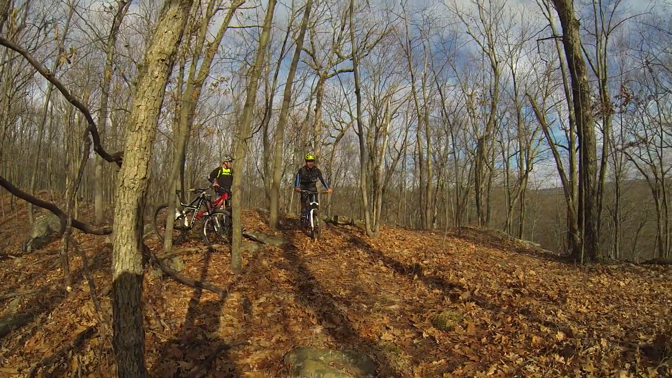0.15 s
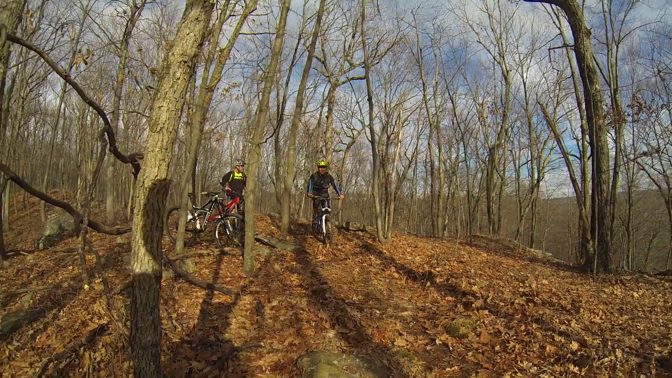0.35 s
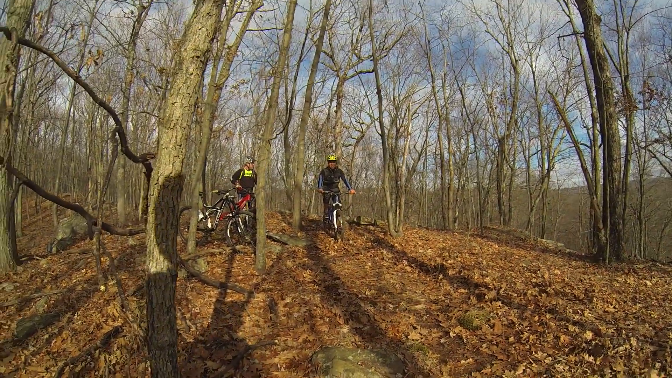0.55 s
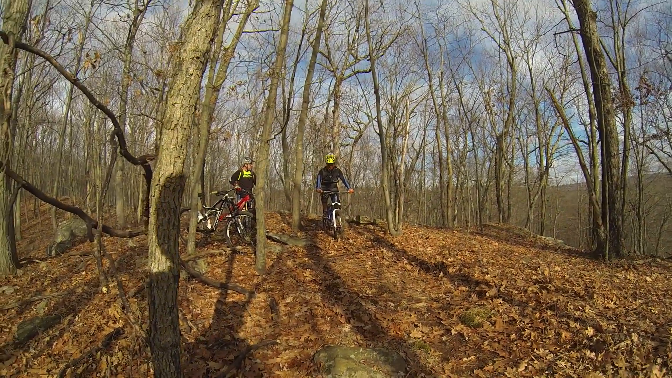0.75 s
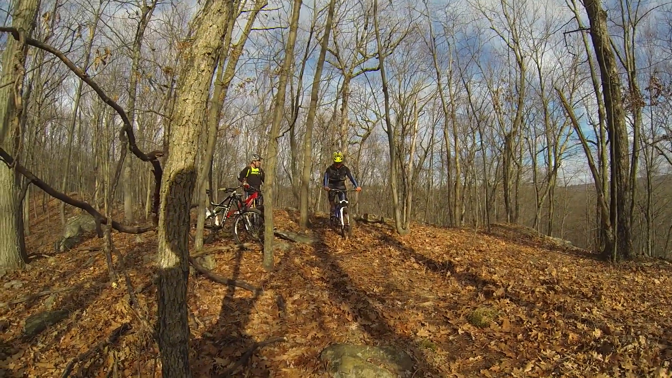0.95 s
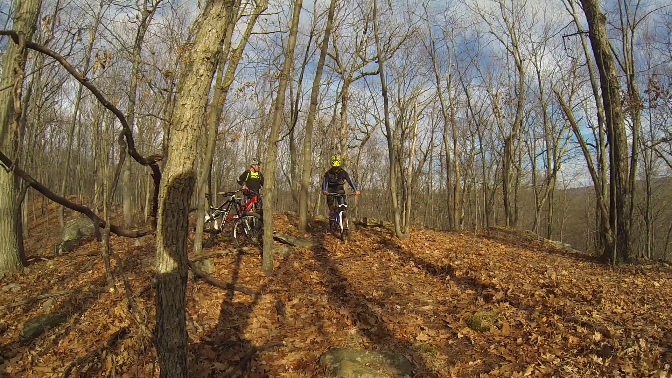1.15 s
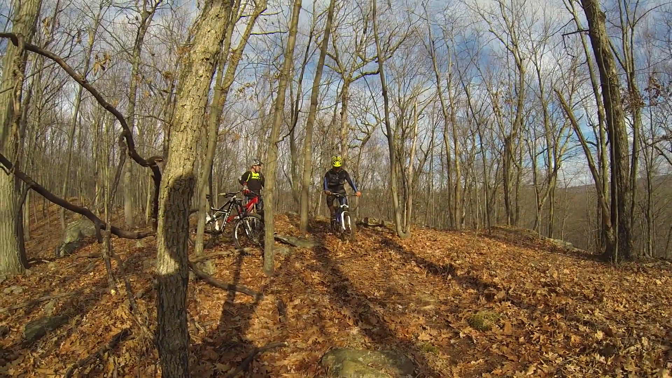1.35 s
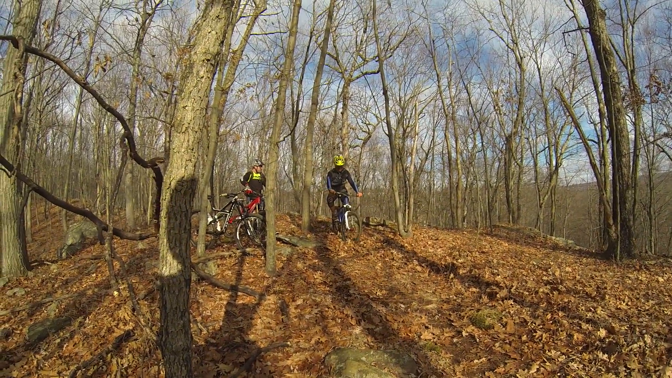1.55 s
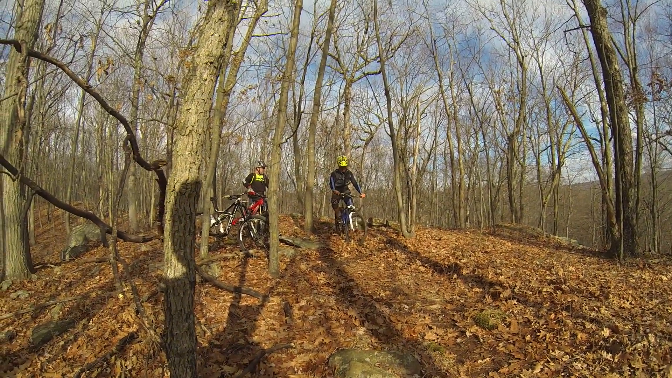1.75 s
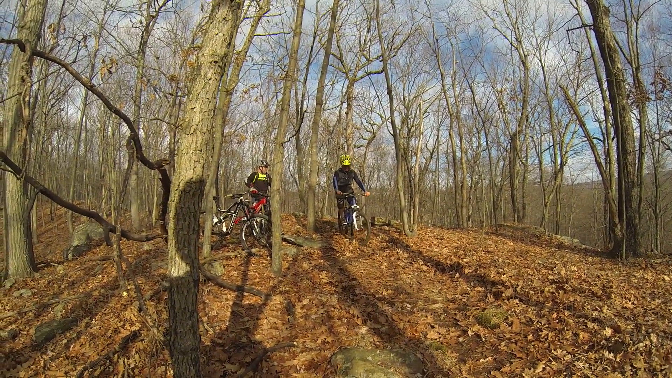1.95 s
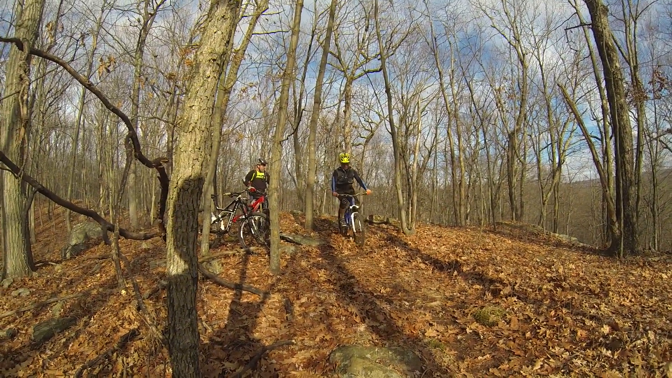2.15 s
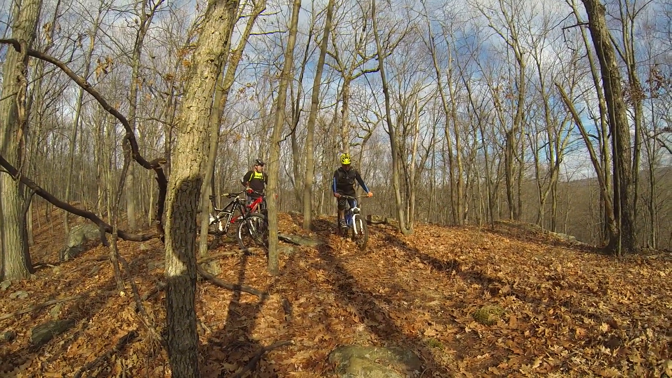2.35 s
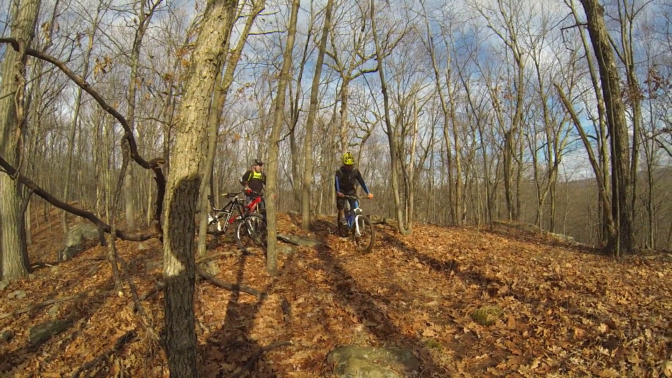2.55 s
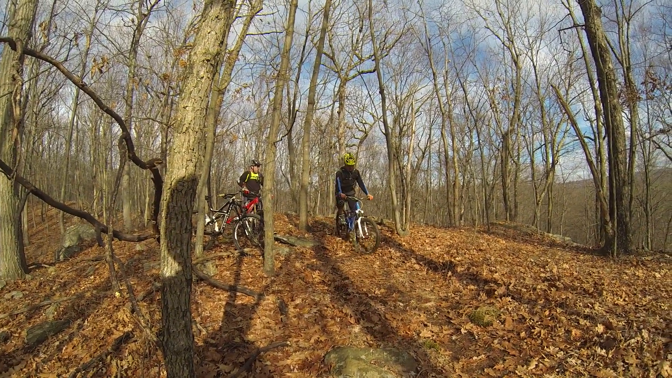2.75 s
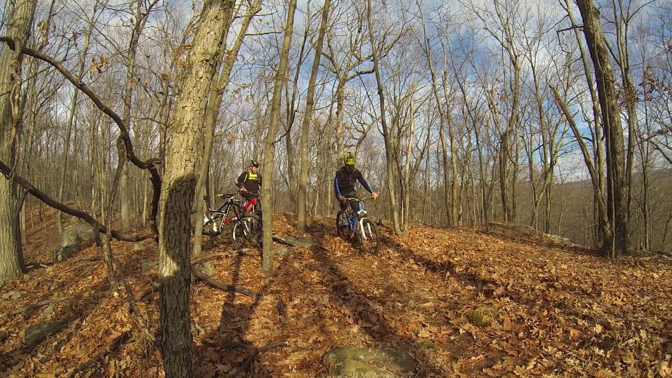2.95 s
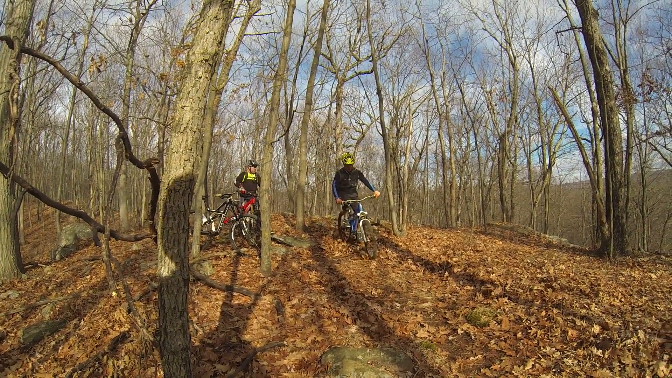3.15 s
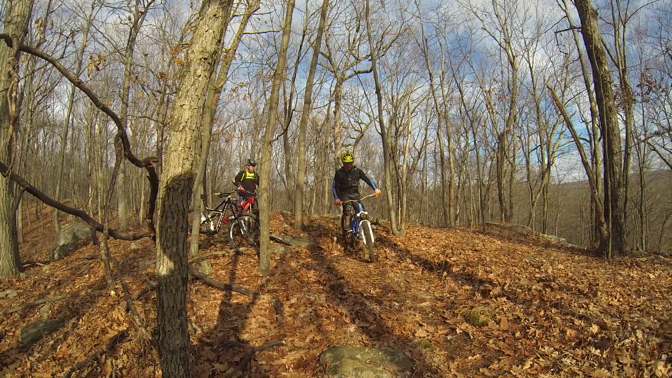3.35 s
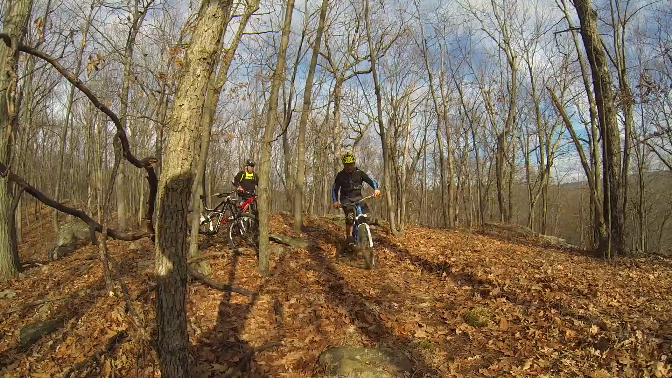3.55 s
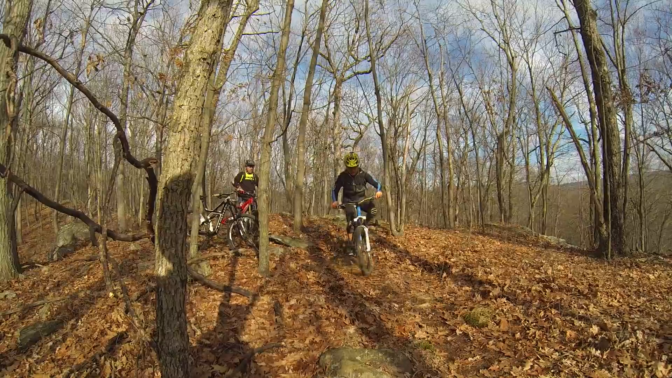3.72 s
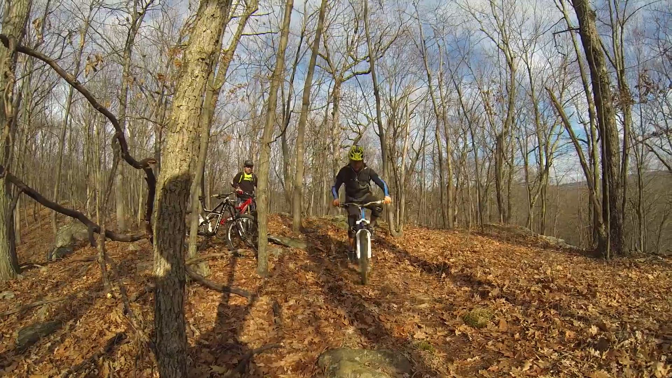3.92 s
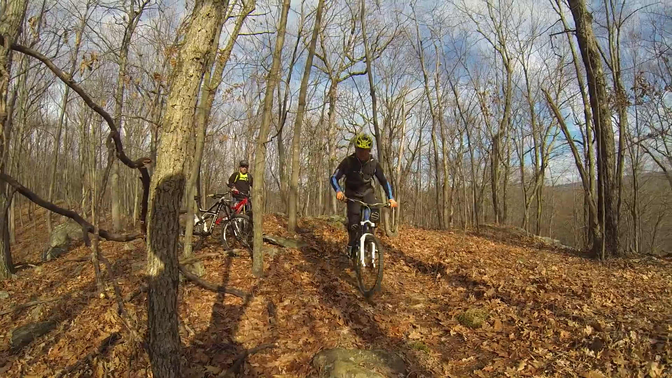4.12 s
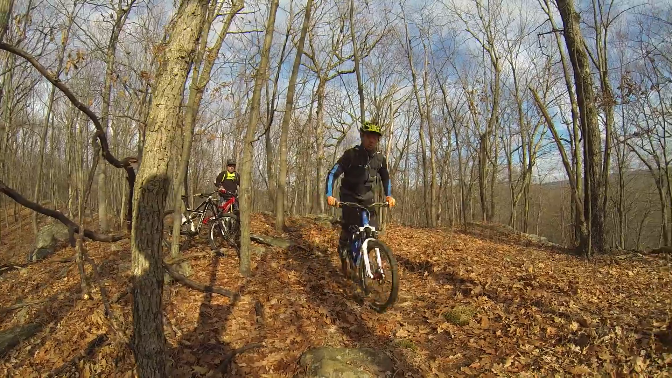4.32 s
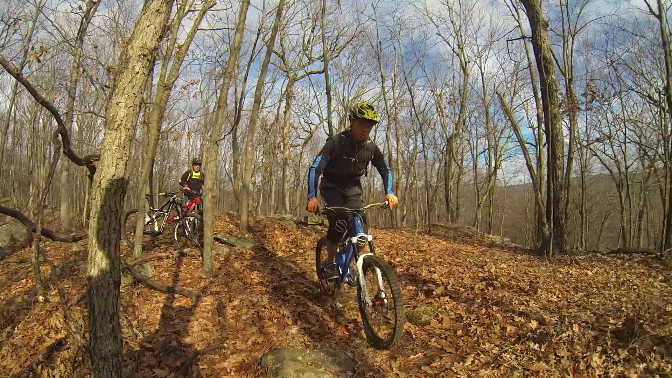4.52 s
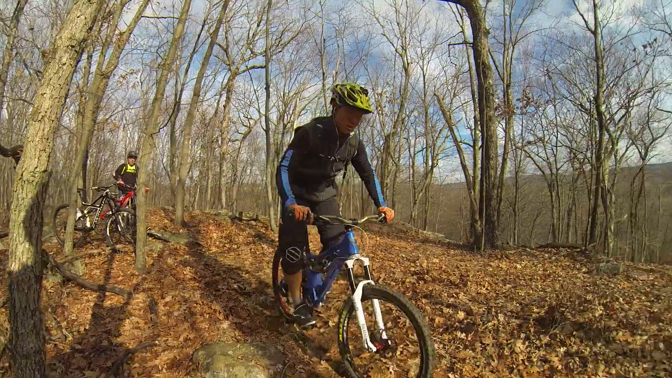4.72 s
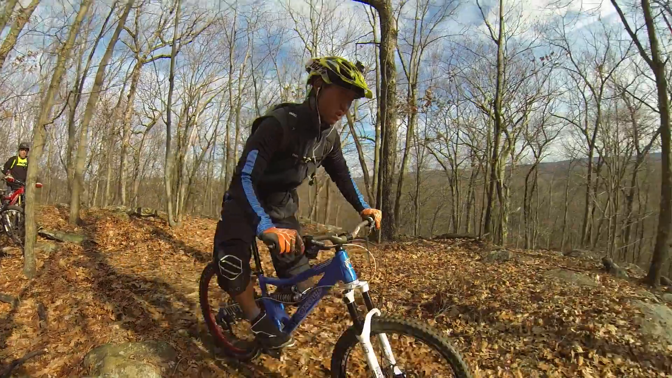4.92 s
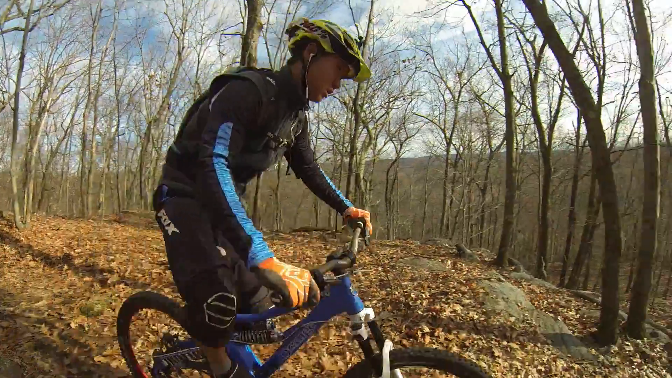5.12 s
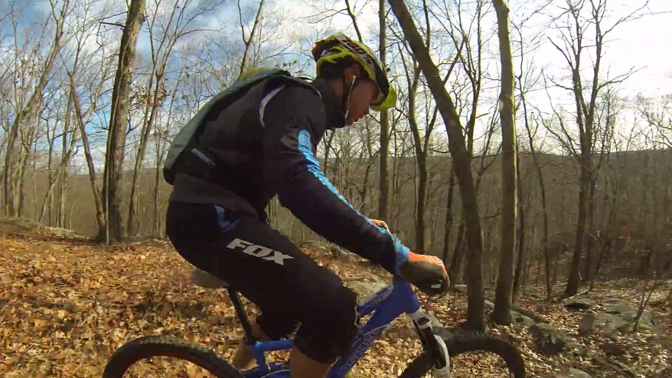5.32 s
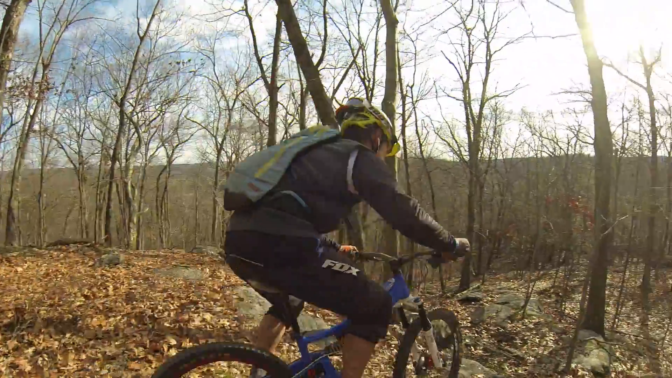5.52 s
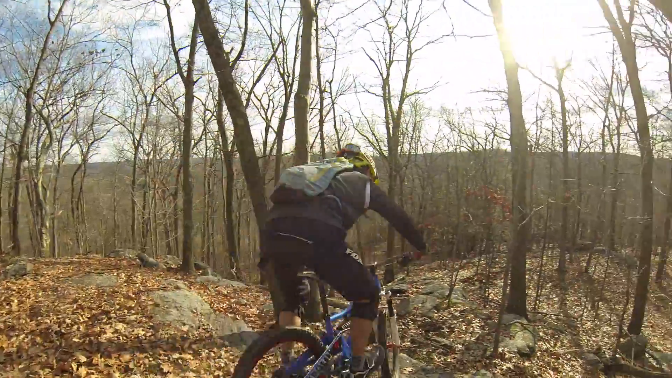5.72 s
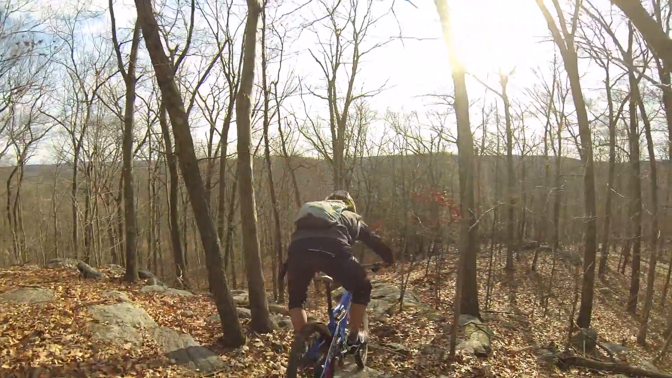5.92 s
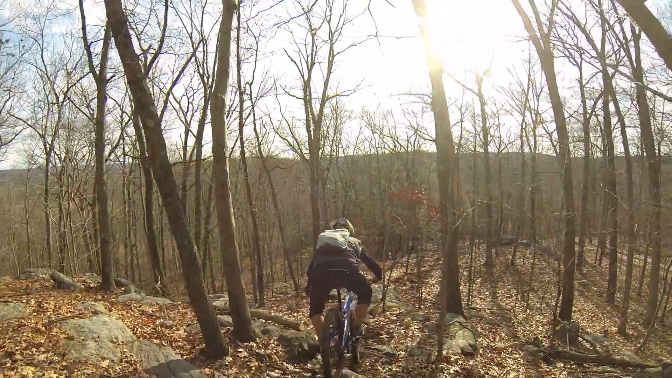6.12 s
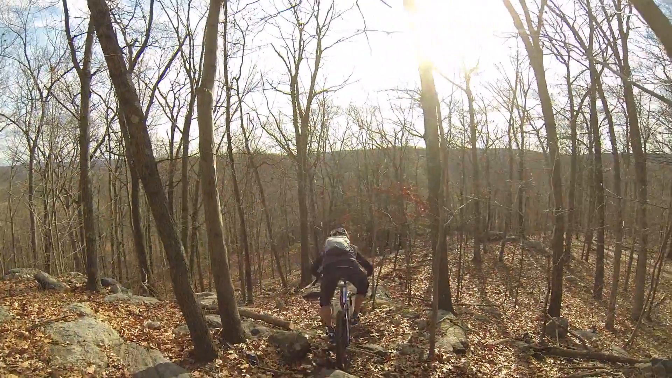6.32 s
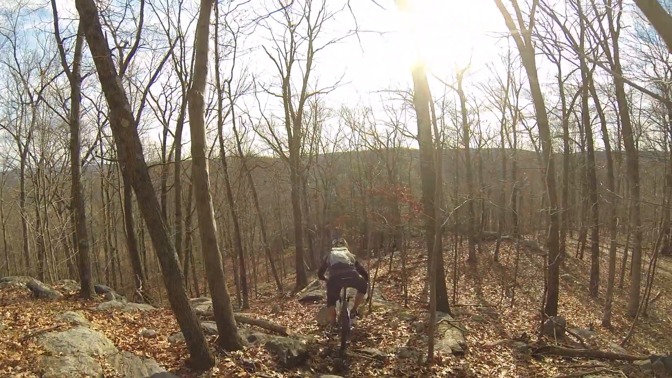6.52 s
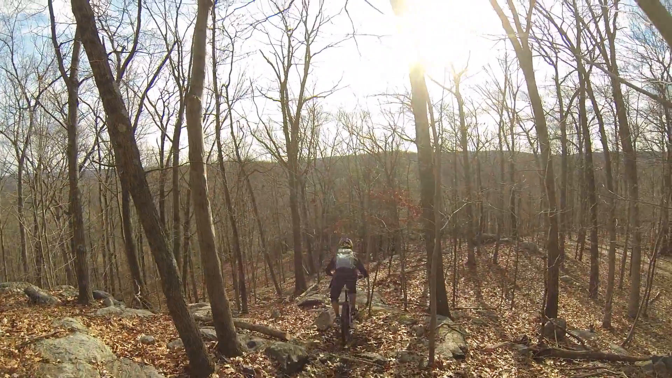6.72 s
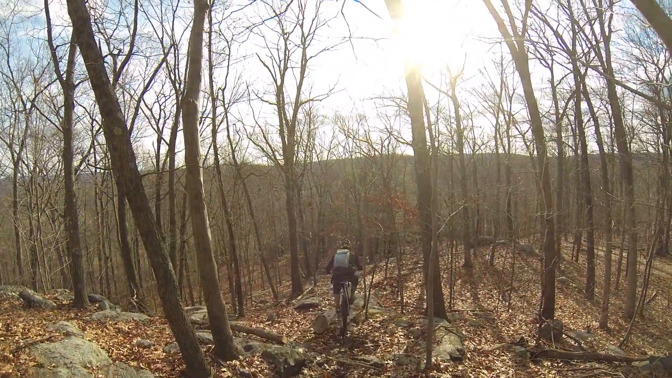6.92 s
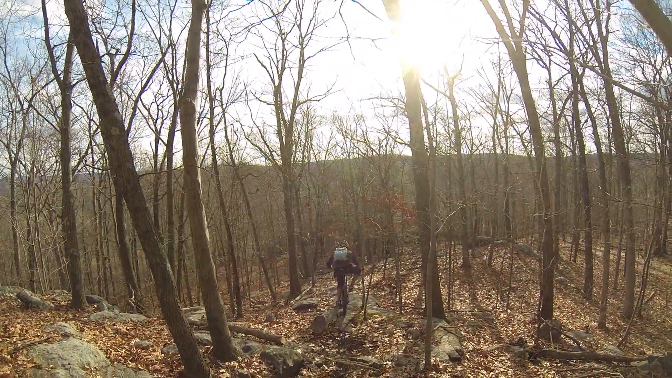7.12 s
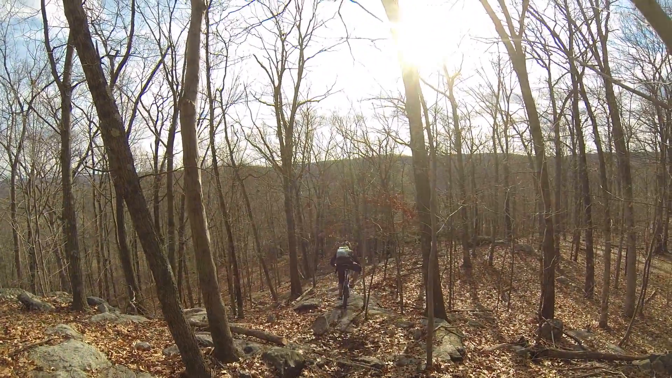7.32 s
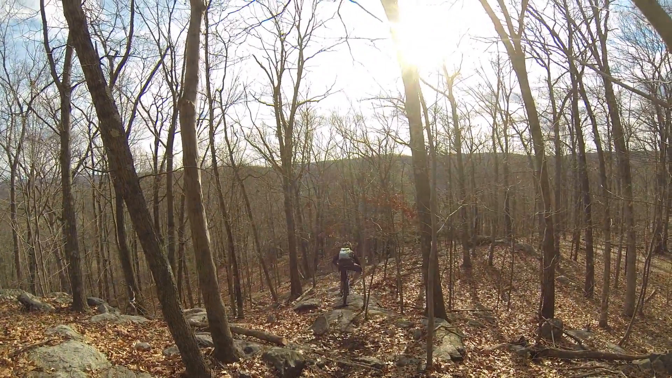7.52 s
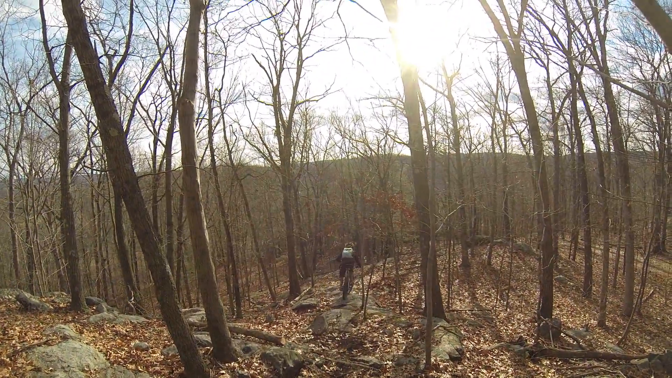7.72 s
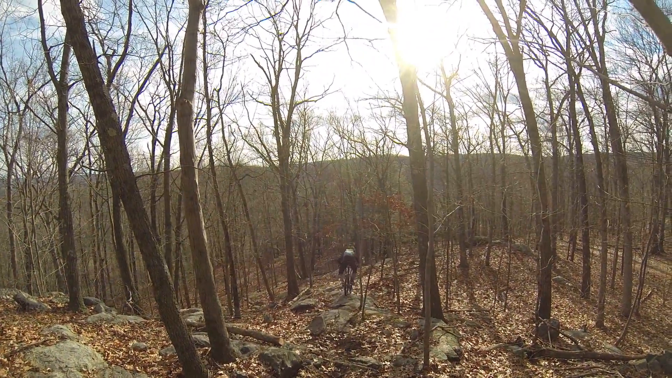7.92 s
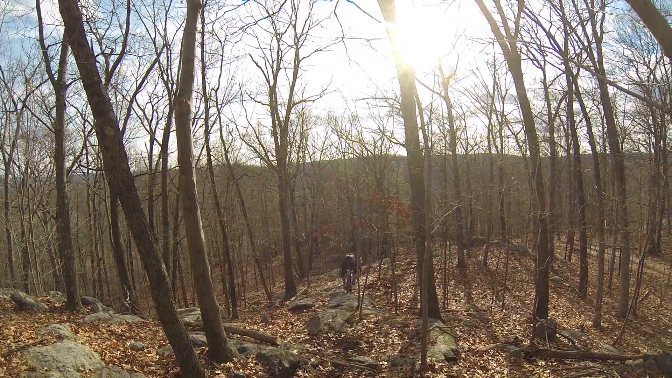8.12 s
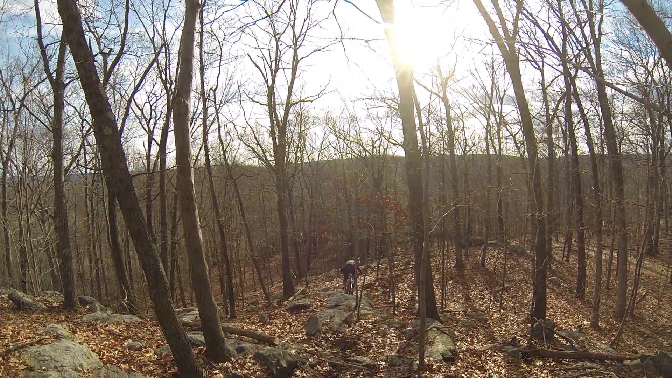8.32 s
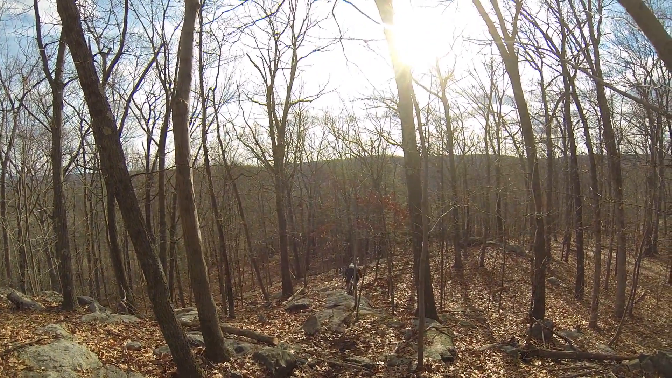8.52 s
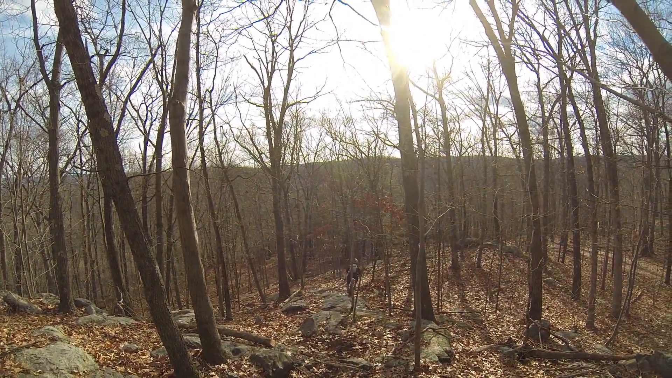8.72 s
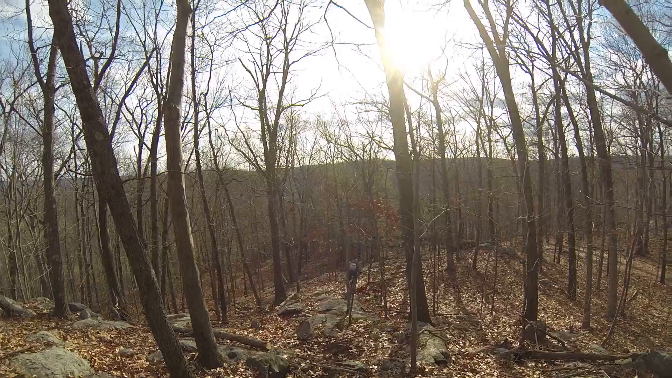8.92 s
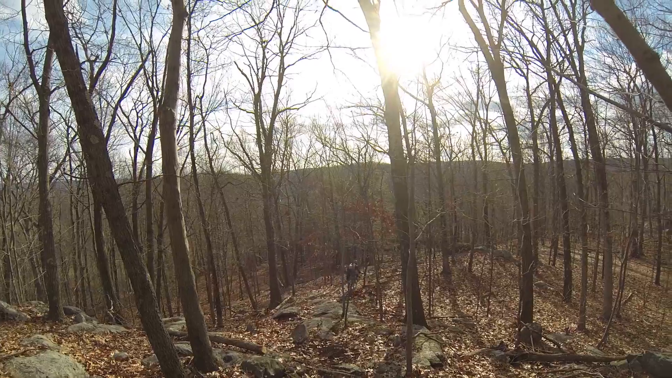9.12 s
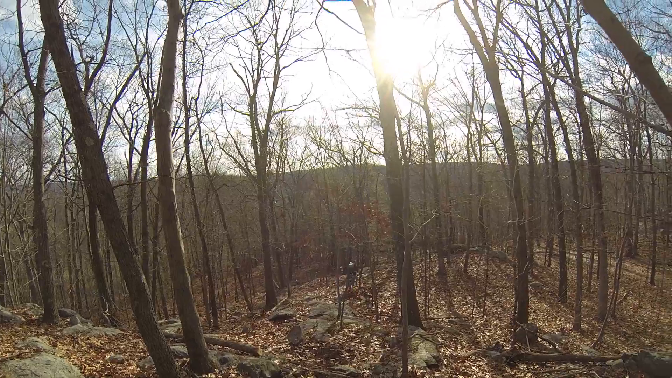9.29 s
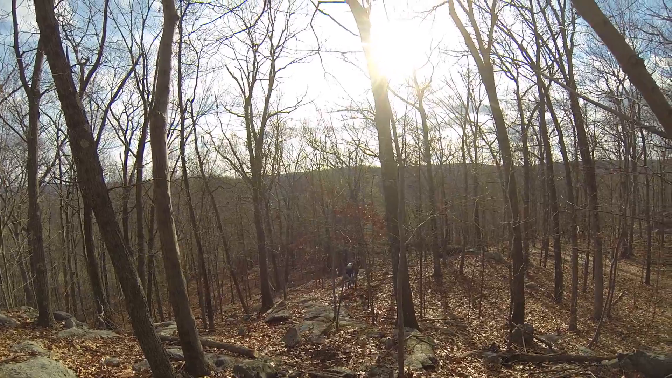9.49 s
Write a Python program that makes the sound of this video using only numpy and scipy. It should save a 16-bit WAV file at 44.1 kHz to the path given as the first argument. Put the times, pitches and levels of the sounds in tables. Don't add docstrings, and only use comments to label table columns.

```python
import sys
import numpy as np
from scipy import signal
from scipy.io import wavfile
from scipy.ndimage import uniform_filter1d

SR = 44100
rng = np.random.default_rng(int(sys.argv[2]) if len(sys.argv) > 2 else 0)


def to_wav(s):
    ch = np.atleast_2d(s).T
    pcm = np.round(np.clip(ch, -1, 1) * 32767)
    wavfile.write(sys.argv[1], SR, pcm.astype(np.int16))


def volts_from_decibels(level):
    exponent = np.asarray(level, float) / 20
    return 10 ** exponent


N = 421243

# (frequency [Hz], level [dB per Hz])
LEAF_COLOUR = [(150, -46.5), (250, -4), (366, -10), (544, -12.5), (870, -9.5), (1280, -6), (1600, 0.5),
               (1900, 1), (2500, -7), (3450, -15), (4170, -25), (5130, -23), (6880, -32.5), (8470, -23),
               (13000, -39), (15500, -52)]


def evened(x):
    return x / np.sqrt(np.mean(x ** 2) + 1e-20)


def curve(rows, t):
    s, *columns = np.transpose(rows)
    return [np.interp(t, s, column) for column in columns]


def coloured(x, points):
    f, db = np.transpose(points)
    hz = abs(np.fft.fftfreq(8192, 1 / SR))
    gain_db = np.interp(np.log(hz + 1), np.log(f), db)
    log_gain = np.log(volts_from_decibels(np.maximum(gain_db, -100)))
    taps = np.fft.ifft(np.exp(np.conj(signal.hilbert(log_gain)))).real[:4096]
    return signal.oaconvolve(x, taps)[:len(x)]


def band(x, lo_hz, hi_hz):
    sos = signal.butter(2, [lo_hz, hi_hz], "bandpass", fs=SR, output="sos")
    return signal.sosfilt(sos, x)


def drift(seconds):
    span = max(int(seconds * SR), 2)
    smooth = uniform_filter1d(rng.standard_normal(N), span)
    return evened(uniform_filter1d(smooth, span))


def burst(t60, size=4096):
    t = np.arange(size) / SR
    return rng.standard_normal(size) * volts_from_decibels(-60 * t / t60) * (1 - np.exp(-t / 0.00075))


def add(mix, s, sound):
    part = mix[round(s * SR):][:len(sound)]
    part += sound[:len(part)]


def wood_air():
    # (frequency [Hz], level [dB per Hz])
    hush = [(59, -19), (100, -2.5), (447, -5.5), (879, -4.5), (1230, -16.5), (1590, -15), (2370, -48),
            (3120, -15.5), (4460, -31), (6950, -39), (8410, -34), (14200, -56), (15500, -58)]
    return volts_from_decibels(-53.5) * evened(coloured(rng.standard_normal(N), hush))


def wind():
    # (time [s], level [dB])
    breeze = [(0.0, -50), (1.2, -52), (3.0, -53.5), (4.4, -48), (5.28, -41.5), (5.36, -22.5), (5.5, -26.5),
              (5.62, -32), (6.12, -32), (6.22, -40), (6.8, -38.5), (7.2, -39), (7.3, -43.5), (8.3, -44.5),
              (9.55, -45)]
    # (time [s], half length [s], lift [dB])
    gusts = [(0.09, .04, -8), (1.903, 0.065, 7.5), (2.077, 0.053, 6), (4.61, 0.044, 9.5), (4.9, .1, -1),
             (5.416, 0.045, 6), (0.344, .2, -2), (3.8, 0.17, -1), (5.537, 0.032, 9.5), (5.977, 0.03, 4),
             (6.136, 0.026, 4), (6.757, .06, 1), (6.986, 0.086, 5), (7.737, 0.062, 11.5), (8.168, 0.032, 5),
             (8.585, 0.097, 12), (9.346, .04, 12), (9.499, .03, 16.5)]
    t = np.arange(N) / SR
    lift_db = sum(db * np.maximum(1 - abs(t - s) / half, 0) for s, half, db in gusts)
    deep = evened(band(rng.standard_normal(N), 17.0, 71.0))
    flutter = evened(band(rng.standard_normal(N), 73.5, 217.3) * volts_from_decibels(3.8 * drift(0.029)))
    flutter_db = -7 - lift_db
    return volts_from_decibels(curve(breeze, t)[0] + lift_db) * (deep + volts_from_decibels(flutter_db) * flutter)


def bump(db, hz):
    t = np.arange(4096) / SR
    push = np.sin(2 * np.pi * hz * t) * volts_from_decibels(-60 * t / 0.019)
    click = band(burst(0.0078), 266, 790)
    return volts_from_decibels(db) * (push + 0.45 * click / abs(click).max())


def finger_bumps():
    # (time [s], peak level [dB], pitch [Hz])
    touches = [(0.093, -24, 110), (0.306, -23.5, 102), (0.688, -38, 290), (0.711, -30.5, 91.5),
               (0.837, -27.5, 114), (2.265, -30, 390), (3.801, -31.5, 182), (4.595, -24, 92),
               (5.637, -15, 96.9), (5.822, -22.5, 306), (6.063, -22, 276), (6.466, -22, 428),
               (9.02, -25.5, 224)]
    out = np.zeros(N)
    for s, db, hz in touches:
        add(out, s, bump(db, hz))
    return out


def squeak(length, top_hz, db, rise, second_db, chatter, sag, ends_db):
    t = np.arange(0, length, 1 / SR)
    slack = np.interp(t, [0, min(rise, length), length], [1, 0, 1])
    wobble, judder = (evened(uniform_filter1d(rng.standard_normal(len(t)), size=n)) for n in (60, 250))
    pitch_hz = top_hz * (1 - sag * slack + 0.07 * chatter * (wobble + judder))
    turn = 2 * np.pi * np.cumsum(pitch_hz) / SR
    scrape = 0.65 * evened(band(rng.standard_normal(len(t)), 800, 2500))
    thin = band(band(rng.standard_normal(len(t)), 8500, 10800), 8500, 10800)
    hiss = volts_from_decibels(-24.0 - 9.0 * slack) * evened(thin)
    tone = np.sqrt(2) * (np.sin(turn) + volts_from_decibels(second_db) * np.sin(2 * turn)) + chatter * scrape
    tone = band(band(tone, 500, 3000), 450, 3300) + chatter * hiss
    swell = volts_from_decibels(db + ends_db * slack + 3.0 * chatter * judder)
    return swell * tone * signal.windows.tukey(len(t), .3)


def brakes():
    # (time [s], length [s], top pitch [Hz], peak level [dB], time to the peak [s])
    chirps = [
        (.115, 0.075, 1340, -37, .037),
        (.565, .045, 1550, -51, .025),
    ]
    whines = [
        (7.268, 0.084, 1286, -47, .035),
        (7.42, .07, 1430, -50, .032),
        (9.03, .06, 1420, -50, 0.041),
    ]
    toots = [
        (2.345, .135, 872, -35.5, .06),
        (2.435, 0.11, 870, -39, 0.064),
        (2.52, .08, 865, -48, .025),
    ]
    grabs = [
        (8.395, 0.099, 1030, -35, 0.012),
        (8.66, 0.1, 1097, -37.5, .035),
    ]
    # (second partial [dB], chatter [0-1], pitch sag at the ends [0-1], level of the ends [dB])
    chirp = (-32, .1, .05, -16)
    whine = (-30, .03, .12, -3)
    toot = (-3, .03, 0.002, -14)
    grab = (-5, .9, .03, -14)
    out = np.zeros(N)
    for rows, way in ((chirps, chirp), (whines, whine), (toots, toot), (grabs, grab)):
        for s, *row in rows:
            add(out, s, squeak(*row, *way))
    return out


def knock(db, hz, crisp_db, share):
    t = np.arange(4096) / SR
    blow = np.sin(2 * np.pi * hz * t) * np.exp(-t * hz * 1.7) * (t * hz) ** 2.63
    rattle = burst(0.031 + 0.016 * abs(share))
    rattle = band(rattle, 0.5 * hz, 1.52 * hz)
    body = band(blow / abs(blow).max() + share * rattle / abs(rattle).max(), 480, 2970)
    body = band(body, 370, 4260)
    snap = burst(0.028)
    crisp = band(band(snap, 7850, 9800), 7100, 20000)
    crisp += 0.55 * band(band(snap, 3000, 6300), 2800, 6400)
    return volts_from_decibels(db) * (body / abs(body).max() + volts_from_decibels(crisp_db - 5.5) * crisp / abs(crisp).max())


def knocks_and_crunches():
    # (time [s], peak level [dB], ring pitch [Hz], crisp part [dB])
    knocks = [(0.172, -29.5, 910, -40), (0.363, -25, 1020, -30), (2.265, -15, 1870, -45),
              (2.284, -20, 1920, -42), (2.293, -20, 1640, -46), (2.315, -28, 1780, -30),
              (2.77, -17.5, 1480, -20), (3.127, -28.5, 1560, -38.5), (3.238, -29, 1610, -40),
              (4.399, -39.5, 1780, 1), (4.508, -27, 880, -14), (4.632, -24, 1970, -38),
              (4.756, -22, 1680, -17), (5.064, -19.5, 1770, -12), (5.243, -32, 1630, -30),
              (5.265, -12, 2070, -15), (5.641, -20.5, 875, -31), (5.807, -19, 920, -22),
              (5.821, -22, 1640, -31), (6.336, -24, 2180, -28), (6.458, -19.5, 1000, -3.5),
              (6.466, -19, 810, -19), (7.065, -29.5, 1860, -35.5), (7.232, -30, 1780, -19),
              (7.606, -31, 1950, -35), (7.659, -31, 1940, -32.5), (8.225, -31.5, 1780, -34),
              (8.579, -32, 1920, -37), (9.456, -31.5, 1810, -32)]
    # (time [s], peak level [dB], ring pitch [Hz], rattle share [ratio])
    crunches = [(1.311, -27, 1300, 0.84), (1.325, -30.5, 1570, 4.2), (1.669, -30, 1210, 0.94),
                (1.867, -33, 1630, 3), (2.019, -32, 1510, 6.3), (2.297, -21.5, 1570, 0.93),
                (4.469, -31, 1840, 3.3), (4.598, -22.5, 1750, 0.72), (5.309, -18, 2000, 1.3),
                (5.503, -18, 1720, 1), (5.954, -18.5, 1790, 1.9), (6.005, -15, 1560, 5.4),
                (6.117, -15.5, 1720, 0.76), (6.228, -14, 1960, 0.6)]
    out = np.zeros(N)
    for s, db, hz, crisp_db in knocks:
        add(out, s, knock(db, hz, crisp_db, share=0.65))
    for s, db, hz, share in crunches:
        crisp_db = -32 + 0.95 * (db + 24)
        add(out, s, knock(db, hz, crisp_db, share))
    return out


def snap_swing(db, hz):
    cycles = (np.arange(200) / SR - .002) * hz
    return volts_from_decibels(db) * np.cos(2 * np.pi * cycles - .35) * np.exp(-.5 * (cycles / .45) ** 2)


def breaking_stick():
    # (time [s], peak level [dB], pitch [Hz])
    swings = [
        (5.7645, -16, 1600),
        (5.7712, -2.3, 1250),
        (5.7738, -14, 1400),
    ]
    out = np.zeros(N)
    for s, db, hz in swings:
        add(out, s - .002, snap_swing(db, hz))
    return out


def spray(length, db, crisp_db, crisp_hz):
    noise = rng.standard_normal((3, SR // 4))[:, :round(length * SR)]
    body = evened(band(coloured(noise[0], LEAF_COLOUR), 700, 8900))
    body += .45 * evened(band(noise[2], 680, 900))
    crisp = band(noise[1], 0.955 * crisp_hz, 1.07 * crisp_hz) + 0.19 * band(noise[1], 12100, 13500)
    late = np.linspace(0, 1, noise.shape[1]) ** 1.77
    swell = np.sin(np.pi * late) ** 2
    return volts_from_decibels(db) * (body + volts_from_decibels(crisp_db) * evened(band(crisp, 7000, 14500))) * swell


def leaf_sprays():
    # (time [s], length [s], level [dB], crisp part [dB], crisp pitch [Hz])
    throws = [
        (.17, 0.27, -34, -12, 8500),
        (1.37, .12, -50.5, -28, 8500),
        (3.5, 0.16, -49, -17, 8500),
        (2.62, 0.21, -45.5, -20, 8500),
        (3.8, 0.22, -53, -16, 10400),
        (4.33, 0.23, -51.5, -8.5, 10200),
        (5.66, 0.17, -37, -15, 8500),
        (6.36, 0.19, -37, -14, 8450),
    ]
    out = np.zeros(N)
    for s, *row in throws:
        add(out, s, spray(*row))
    return out


def freewheel():
    # (time [s], rate [pawl drops per s])
    coast = [(4.96, 45.713), (5.023, 56.328), (5.21, 34.9), (5.212, 41.9), (5.597, 29.137), (5.779, 51.054),
             (5.939, 43.588), (6.106, 29.291), (6.3, 56), (6.6, 58), (6.78, 40), (7.1, 56), (7.32, 29),
             (7.5, 58), (7.85, 29), (8.05, 58), (9.55, 64)]
    # (time [s], peak level [dB])
    ticking = [(4.96, -37.5), (5.15, -38), (5.3, -31), (5.62, -34), (5.8, -31.5), (6.2, -52), (6.45, -53),
               (6.9, -52), (7.5, -55.5), (7.85, -61), (8.1, -59), (9.55, -65)]
    # (frequency [Hz], level [dB])
    near_colour = [(200, -57), (900, -4), (1900, 8.5), (3500, 4), (6800, -26.5), (8400, -1), (10500, -14.5),
                   (13000, -21), (15500, -33)]
    # (frequency [Hz], level [dB])
    far_colour = [(600, -50), (2200, -12), (3500, -22), (7000, -28), (8400, 2), (9300, -3), (10500, 3),
                  (11800, -22), (15500, -36)]
    far_from_s, spread_db, far_jitter_s = 6.4, 2.5, .002
    t = np.arange(coast[0][0], coast[-1][0], 1 / SR)
    count = np.cumsum(curve(coast, t)[0]) / SR
    times = np.interp(np.arange(1, count[-1]), count, t)
    out, chance = np.zeros(N), rng.standard_normal((len(times), 2))
    for far, colour in enumerate((near_colour, far_colour)):
        drops = np.zeros(N)
        for s, (size, slip) in zip(times, chance):
            if (s > far_from_s) == far:
                db = curve(ticking, s)[0] + size * spread_db
                tick = burst(0.017, size=2048) + 0.24 * burst(0.081, size=2048)
                add(drops, s + far * far_jitter_s * slip, volts_from_decibels(db) * tick)
        strength = np.std(band(coloured(rng.standard_normal(SR), colour), 6000, 12000))
        out += volts_from_decibels(-5.5) * coloured(drops, colour) / strength
    return out


def leaf_crush():
    # (low limit [Hz], high limit [Hz], time to fall 60 dB [s], level [dB])
    snap_kinds = [(244, 1610, 0.027, -3.5), (1100, 2360, 0.012, 4), (1970, 6100, 0.0073, -0.5),
                  (3770, 14000, 0.016, 2), (8950, 13400, 0.014, 4.5), (1560, 4500, 0.0061, -0.5)]
    rate = 1300 * volts_from_decibels(4.0 * drift(.02))
    size = volts_from_decibels(3.75 * np.minimum(rng.exponential(1, N), 4)) * (rng.random(N) < rate / SR)
    kind = rng.integers(0, len(snap_kinds), N)
    snaps = np.zeros(N)
    for k, (lo_hz, hi_hz, t60, db) in enumerate(snap_kinds):
        shape = burst(t60)
        one_snap = band(shape, lo_hz, hi_hz) / np.linalg.norm(shape)
        snaps += volts_from_decibels(db) * signal.oaconvolve(size * (kind == k), one_snap)[:N]
    rustle = rng.standard_normal(N) * volts_from_decibels(2.2 * drift(0.073))
    crush = coloured(0.63 * evened(snaps) + 0.68 * rustle, LEAF_COLOUR)
    return crush / np.std(band(crush, 1130, 3240))


def tyres_in_leaves():
    # (time [s], crush level [dB], crispness [dB], turned away [dB])
    roll = [(0.0, -52, 4.5, 19), (0.55, -52.5, 5.5, 18.5), (0.72, -65.5, 4, 21), (1.2, -62.5, 2, 25),
            (1.55, -56.5, -5, 17), (1.9, -54.5, 0.5, 7), (2.25, -47, 0, 10), (2.75, -44.5, -4, 4.5),
            (3.45, -48, -1, 7.5), (4.1, -53, 0.5, 18), (4.5, -45, -3, 5.5), (4.86, -37, 4, 9),
            (5.42, -39, -5, 9), (5.78, -36.5, -1, 13), (6.42, -42, 5.5, 13), (6.85, -47.5, -2, 13.5),
            (7.7, -50.5, -11.5, 16.5), (9.55, -51, -3, 12.5)]
    # (centre [Hz], width [octaves], gain [dB per dB of crispness], gain [dB per dB of turning away])
    openings = [(785, 0.39, 0, 0.9683), (8500, 0.096, 1.85, 0), (12700, 0.081, 0.3, 0),
                (4930, 0.31, 0.55, -0.1539), (10200, 0.11, 0.2, -0.06), (14400, 0.14, .3, 0.45)]
    hz, t, z = signal.stft(leaf_crush(), SR, nperseg=256, noverlap=192)
    level_db, crisp_db, away_db = curve(roll, t)
    patches = uniform_filter1d(uniform_filter1d(rng.standard_normal(z.shape), 3, 0), 40, 1)
    field_db = level_db[None] + 1.0 + 1.9 * evened(patches) / (1 + hz[:, None] / 5000)
    for centre_hz, octaves, per_crisp, per_away in openings:
        shape = np.exp(-.5 * (np.log2((hz + 1) / centre_hz) / octaves) ** 2)
        field_db += shape[:, None] * (per_crisp * crisp_db + per_away * (away_db + 0.5))
    return signal.istft(z * volts_from_decibels(field_db), SR, nperseg=256, noverlap=192)[1][:N]


def scene():
    around = wood_air() + wind() + finger_bumps()
    struck = brakes() + knocks_and_crunches() + breaking_stick()
    rolling = leaf_sprays() + freewheel() + tyres_in_leaves()
    return (around + struck + rolling)[None]


def band_limit(x):
    return signal.sosfilt(signal.butter(12, 15700, fs=SR, output="sos"), x)


def record(dry):
    # (centre [Hz], width [Hz], gain [dB])
    case = [(3950, 200, -4), (4700, 350, 3), (9200, 350, -2), (10400, 500, 3), (12700, 450, 4),
            (14700, 500, 4)]
    hz = np.linspace(0, SR / 2, 1025)
    ring_db = sum(db * np.exp(-.5 * ((hz - f) / width) ** 2) for f, width, db in case)
    gain = volts_from_decibels(ring_db) * (hz < 15420)
    taps = signal.firwin2(1023, hz, gain, fs=SR, window=("kaiser", 9))
    return band_limit(signal.oaconvolve(dry, taps[None], "same"))


dry = scene()
out = record(dry)
to_wav(out)
```